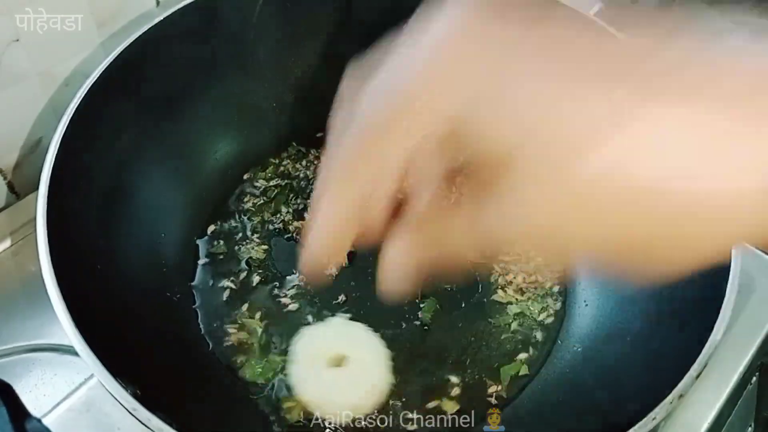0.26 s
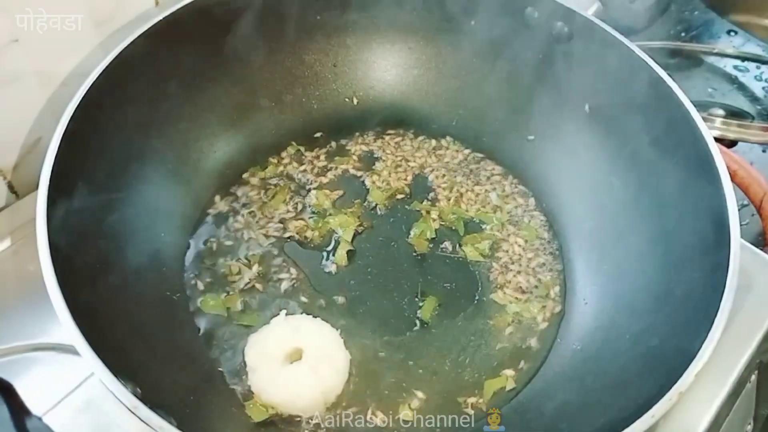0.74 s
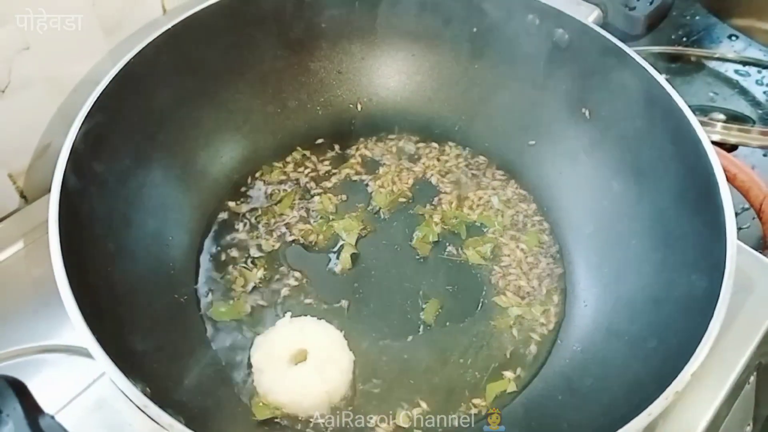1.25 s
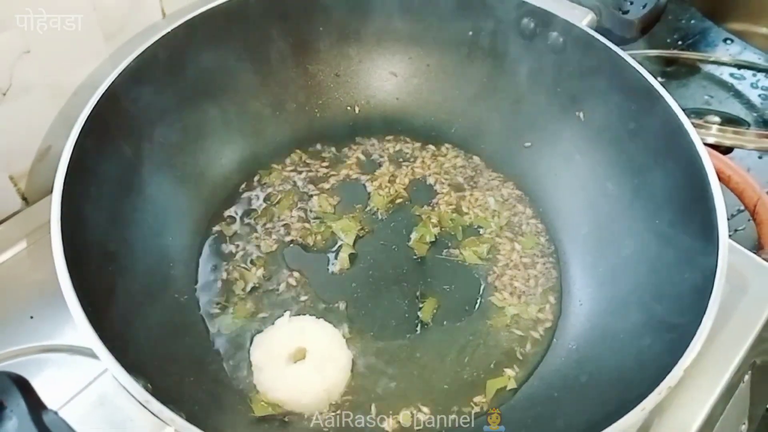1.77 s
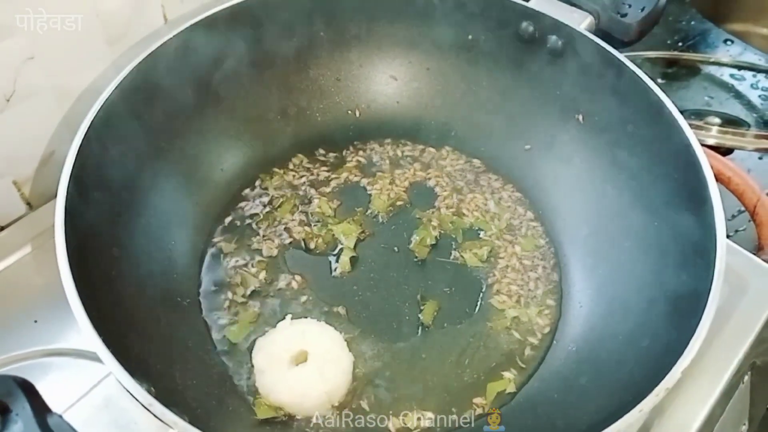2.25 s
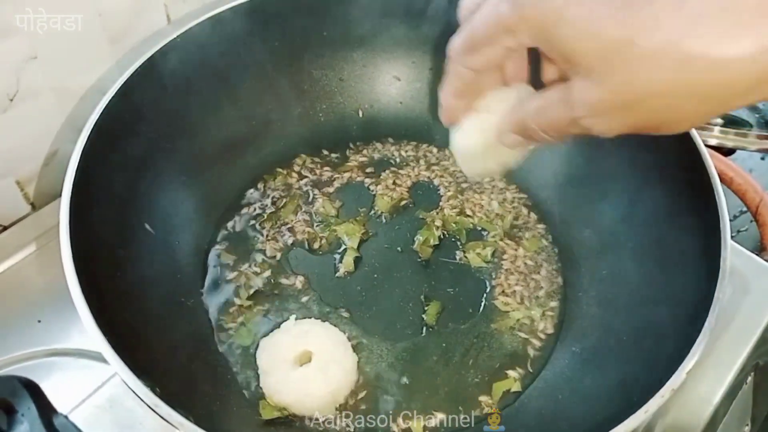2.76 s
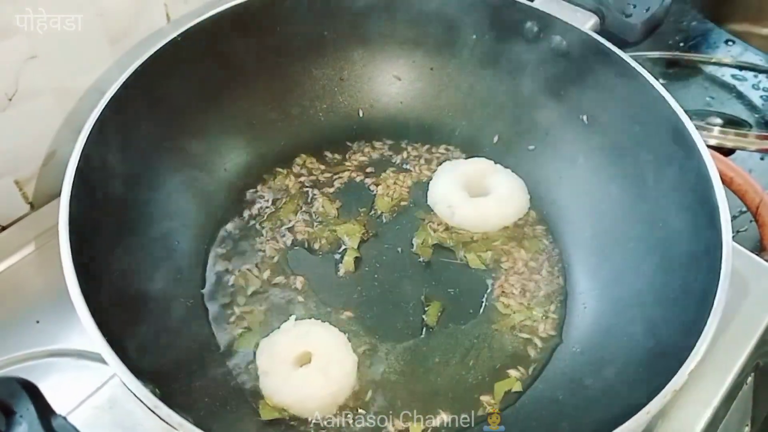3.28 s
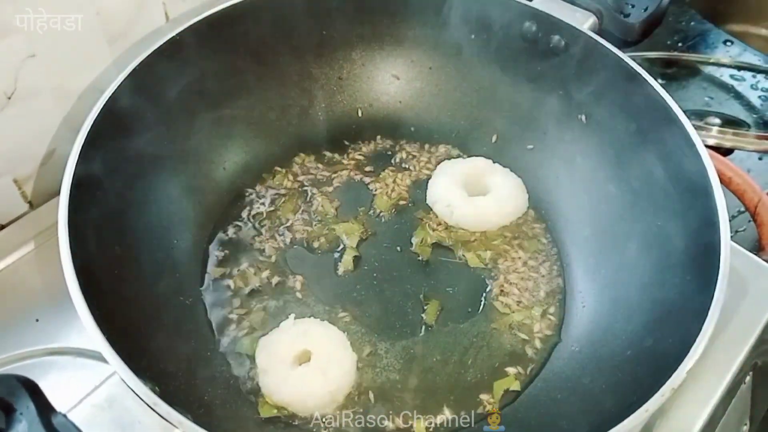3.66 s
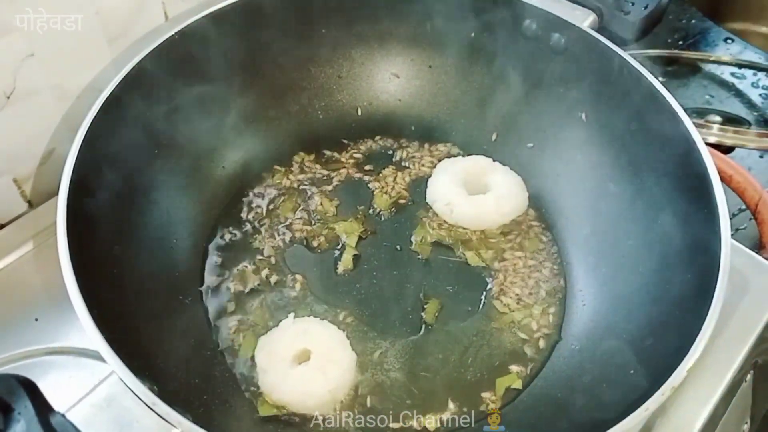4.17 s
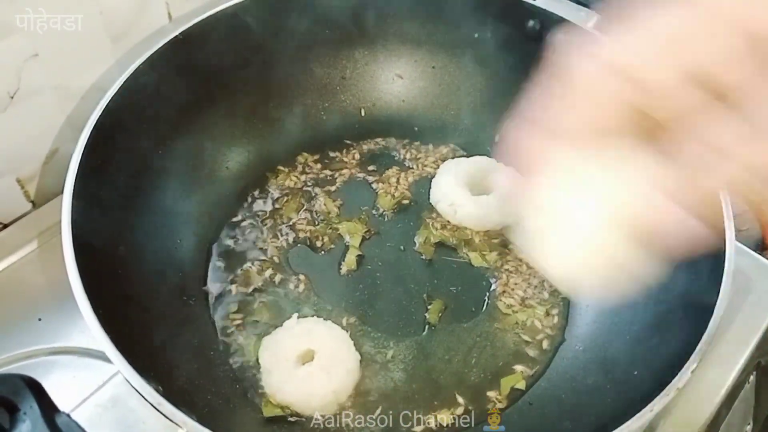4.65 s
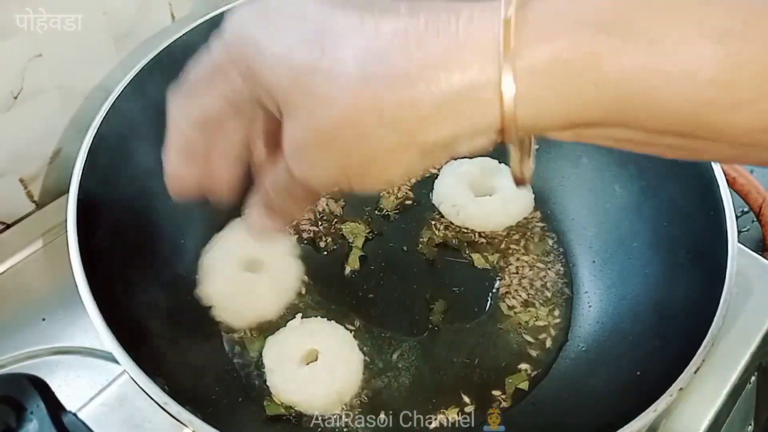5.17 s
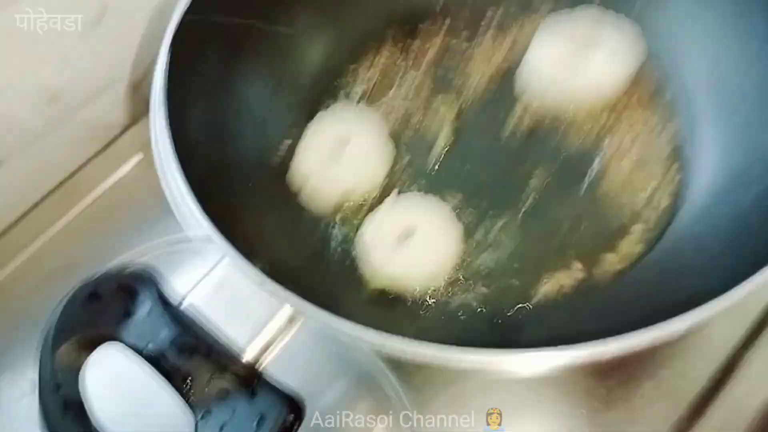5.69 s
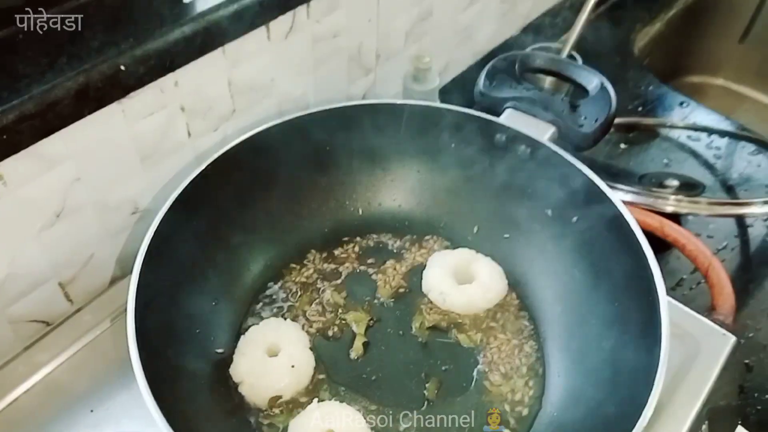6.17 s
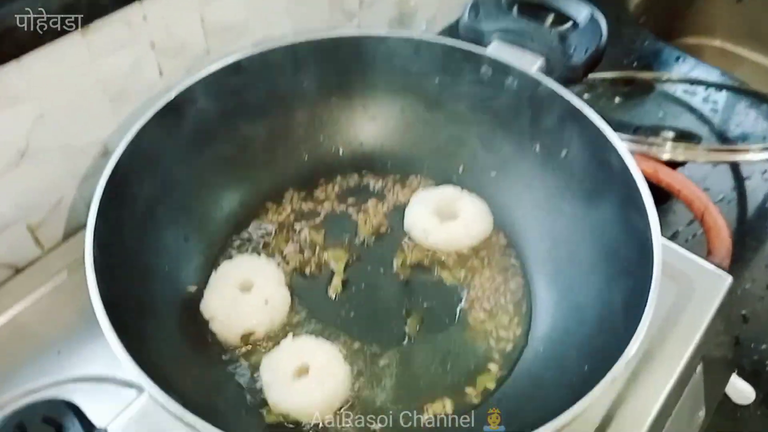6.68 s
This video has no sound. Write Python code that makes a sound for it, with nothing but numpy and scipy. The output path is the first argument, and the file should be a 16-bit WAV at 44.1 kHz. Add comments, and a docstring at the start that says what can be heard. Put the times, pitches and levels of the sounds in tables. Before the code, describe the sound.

A close, single-channel microphone hears hot oil in a pan in a small, hard-surfaced kitchen. At 0 s there is a soft low knock, a thin hissing simmer, a quiet low murmur and hum, and a faint rattle fluttering about twelve times a second. Two bright pops snap near 0.2 s, then it is sparse; the simmer lifts slightly at 0.8 s. From 1 s seeds crack one by one, crowding together from 2.3 to 3.5 s, with more muffled knocks. At about 3.55 s moisture hits the oil: a dense, bright sizzle erupts almost instantly, with sputtering and lower bubbling, strongest until about 3.8 s. It eases to a lower level near 4.9 s, swells around 5.6 s, dips near 5.9 s, then surges again from 6.2 s. Sharp spits, many lesser crackles and small microphone thumps continue to the end, near 6.9 s, without fading.

```python
"""Seeds and moist cakes in hot oil

Hot oil in a steel pan, heard from close by: seeds pop one by one over a thin simmer, then moist cakes burst
into a dense sizzle. Sizzle is hiss mixed with many tiny ringing bubbles; pops are short tones in a noisy crack.
Strong bursts push the microphone with a low thud. Filtered noise makes a murmur, a hum and a rattle about
twelve times a second; fading low tones make soft knocks, and two faint, slightly unsteady tones come and go."""
import sys
import numpy as np
from scipy import signal
from scipy.fft import rfft, irfft, next_fast_len
from scipy.io import wavfile
from scipy.ndimage import uniform_filter1d, map_coordinates

SR = 44100
rng = np.random.default_rng(int(sys.argv[2]) if len(sys.argv) > 2 else 0)


def log_audio(samples):
    """Write samples as a 16-bit WAV file to the path given in sys.argv[1]."""
    # one column per channel
    frames = np.atleast_2d(samples).T
    # limit to full scale, then quantise
    limited = np.clip(frames, -1, 1)
    pcm = np.round(limited * 32767).astype(np.int16)
    wavfile.write(sys.argv[1], SR, pcm)


N = 305613  # length in samples


def amp(db):
    """Turn decibels into a plain multiplier."""
    return 10 ** (np.asarray(db) / 20)


def unit(x):
    """Scale x to an average (rms) level of 1."""
    return x / np.sqrt(np.mean(x ** 2) + 1e-20)


def along(points, hz):
    """Read (Hz, value) points at any frequency, spaced the way we hear pitch."""
    f, v = np.transpose(points)
    return np.interp(np.log(hz + 1), np.log(f + 1), v)


def curves(rows):
    """Give one value per sample for each column after the time."""
    s, *cols = np.transpose(rows)
    return [np.interp(np.arange(N) / SR, s, c) for c in cols]


def wobble(rate):
    """A smooth random curve with `rate` random points a second."""
    knots = rng.standard_normal(int(N * rate / SR) + 4)
    return map_coordinates(knots, [np.arange(N) * rate / SR])


def filtered(x, response):
    """Multiply each frequency in x by a response, which may also shift its phase."""
    m = next_fast_len(N + SR // 2)
    spectrum = rfft(x, m) * response(np.fft.rfftfreq(m, 1 / SR))
    return irfft(spectrum, m)[..., :N]


def coloured(x, spectrum):
    """Shape x with (Hz, dB) points, then bring it to rms 1."""
    return unit(filtered(x, lambda hz: amp(along(spectrum, hz))))


def resonances(modes):
    """The response of things that ring at (Hz, width Hz, dB); every other one is turned upside down."""
    def response(f):
        total = 0
        for k, (centre, width, db) in enumerate(modes):
            damping = 1j * f * width
            total = total + (-1) ** k * amp(db) * damping / (centre * centre - f * f + damping)
        return total
    return response


def placed(s, shapes):
    """Add each row of shapes into the sound at its time in seconds."""
    at = np.round(s * SR).astype(int)[:, None] + np.arange(shapes.shape[1])
    return np.bincount(at.ravel(), shapes.ravel(), N + SR)[:N]


FLARE_S, RISE_S, FLARE_DIES_S = 3.555, .045, .12  # start, rise time, decay time of the flare (s)


def flare(late_s):
    """Moisture meets the oil: how far the sizzle has set in (0-1), and what is left of its flare (1-0)."""
    t = np.arange(N) / SR - FLARE_S - late_s
    risen = np.clip(t / RISE_S, 0, 1)
    left = np.exp(-np.clip(t - RISE_S, 0, None) / FLARE_DIES_S)
    return risen, left


# Level of the quiet background: it fades, jumps up once, then wavers.
# Each row: time in seconds, base level in dB.
QUIET_LEVEL = [(0, -38.5), (.3, -42), (.76, -45.5), (.8, -36), (.94, -38), (1.05, -43), (1.6, -44),
               (1.9, -40), (2.4, -43), (2.9, -42), (3.2, -43), (3.5, -40.5)]
# Level of the dense sizzle.
# Each row: time in seconds, base level of fizz and spray in dB, of splutter and seethe in dB.
BOIL = [(3.7, -22, -33.5), (3.75, -19, -33.5), (3.8, -18, -31.5), (4.06, -23, -35.5), (4.54, -25.5, -37.5),
        (4.69, -25.5, -40), (4.93, -28, -39.5), (5.16, -25, -37), (5.45, -24, -34), (5.67, -22.5, -35),
        (5.84, -27.5, -37), (6.07, -27.5, -37), (6.26, -23.5, -34), (6.51, -25, -36), (6.72, -24, -36),
        (6.93, -22.5, -30.5)]
# Balance of the layers. Each entry: dB added to the quiet level, dB added to the sizzle, extra dB at the flare.
LAYERS = {"fizz": (0, -2, -1.8), "splutter": (-3.1, 1.97, 9.8), "seethe": (-6.5, -2.83, 5),
          "spray": (-8.5, -15, 0)}
# Each layer joins the sizzle a little late. Each entry: delay in seconds.
LATE_S = {"fizz": .005, "splutter": .015, "seethe": .095, "spray": .02}


def strength_of(layer):
    """Gain of a bubble layer: the quiet level, plus the sizzle once it reaches this layer."""
    calm_db, busy_db, flare_db = LAYERS[layer]
    risen, left = flare(LATE_S[layer])
    fizz_spray_db, splutter_seethe_db = curves(BOIL)
    boil_db = splutter_seethe_db if layer in ("splutter", "seethe") else fizz_spray_db
    quiet = amp(curves(QUIET_LEVEL)[0] + calm_db)
    boil = risen * amp(boil_db + busy_db + flare_db * left)
    return np.hypot(quiet, boil)


# Small bursts per second, before each layer takes its share: always, added by the sizzle, added by the flare
CALM_RATE, SIZZLE_ADDS_RATE, FLARE_ADDS_RATE = 18, 450, 350
CALM_STRENGTH, BUSY_STRENGTH = 0.19, 0.82  # weight of bursts in the mix with the hiss


def spatter(pitch_hz, octaves, cycles, share, spread_db, hiss):
    """Hiss plus tiny bubbles that burst at random pitches, a few much larger than most."""
    risen, left = flare(0)
    rate = CALM_RATE + risen * (SIZZLE_ADDS_RATE + FLARE_ADDS_RATE * left)
    strength = CALM_STRENGTH + risen * (BUSY_STRENGTH - CALM_STRENGTH)
    s = np.flatnonzero(rng.random(N) < share * rate / SR) / SR
    t = np.arange(300) / SR
    luck = rng.standard_normal((len(s), 2))
    hz = np.clip(pitch_hz * 2 ** (octaves * luck[:, :1]), 300, 15000)
    life = cycles / hz * np.exp(0.2 * luck[:, 1:])  # seconds
    size = amp(spread_db * np.minimum(rng.exponential(size=(len(s), 1)), 3))
    ring = t / life * np.exp(-t / life) * np.sin(2 * np.pi * hz * t)
    bubbles = placed(s, size * ring)
    # Level the bubbles over half a second, so that strength alone sets their weight
    power = np.abs(uniform_filter1d(bubbles ** 2, SR // 2)) + 1e-9
    mix = strength * bubbles / np.sqrt(power) + hiss * rng.standard_normal(N)
    return mix / np.hypot(strength, hiss)


# Tone colour of fizz, splutter and broad cracks. Each row: frequency in Hz, relative level in dB.
FIZZ = [(1470, -35), (2500, -18.5), (3290, -13), (3860, -7), (4820, -9), (5080, -7), (7880, -2),
        (8990, 2.5), (9410, 2), (12000, -16.5), (15600, -27), (22000, -120)]


def fizz_and_splutter(surge):
    """Bubbles break at the oil's surface: fizz above about 6 kHz, splutter from about 3 to 6 kHz."""
    bubbles = spatter(8030, octaves=0.57, cycles=0.77, share=1.1, spread_db=2.5, hiss=.85)
    fine = coloured(bubbles, FIZZ)
    lower = filtered(fine, lambda f: 1 / (1 + (f / 6000) ** 6) / (1 + (2900 / (f + 1)) ** 10))
    upper = filtered(fine, lambda f: 1 / (1 + (6000 / (f + 1)) ** 6))
    fizz = strength_of("fizz") * unit(upper)
    splutter = strength_of("splutter") * unit(lower)
    return amp(1.23 * surge) * (fizz + splutter)


# Tone colour of the finest bubbles. Each row: frequency in Hz, relative level in dB.
SPRAY = [(6470, -74), (11000, 4.5), (11800, -2), (13800, 11.5), (15600, -0.5)]


def spray(surge):
    """The finest bubbles sound highest, as a flickering hiss."""
    finest = spatter(11500, octaves=0.24, cycles=1.9, share=0.44, spread_db=7, hiss=2.3)
    flicker = amp(1.6 * surge + 0.77 * wobble(27))
    return strength_of("spray") * flicker * coloured(finest, SPRAY)


# Large bubbles, coloured by the pan's low resonances. Each row: frequency in Hz, relative level in dB.
SEETHE = [(400, -11.5), (900, -2.5), (1200, -11.5), (1330, 5.5), (1420, -7.5), (1530, 1), (1750, -0.5),
          (2050, 1), (2500, 1), (3500, 2), (4600, -4), (7700, -120)]
# Narrow ringing notes of the pan. Each row: frequency in Hz, width in Hz, relative level in dB.
PAN_RINGS = [(857, 21, -5.5), (1321, 37, 4), (1533, 24, 0), (1568, 24, 3), (2043, 14, -2), (3110, 14, -11),
             (3554, 18, 7), (4278, 17, -4)]
PAN_RING_DB = -8  # mean level of the ringing against the seethe


def seethe(surge):
    """Large bubbles sound lower, and keep the pan ringing at its own notes."""
    large = spatter(2305, octaves=0.529, cycles=1.53, share=.6, spread_db=3.5, hiss=2.19)
    bubbling = amp(0.64 * surge + 2.2 * wobble(12)) * coloured(large, SEETHE)
    pan = unit(filtered(large, resonances(PAN_RINGS)))
    ringing = amp(PAN_RING_DB + 3.2 * wobble(5.5)) * pan
    return strength_of("seethe") * (bubbling + ringing)


def sizzle():
    """Steam bubbles break at the oil's surface, the smaller the higher; the bubbling layers share a surge."""
    surge = wobble(16) + 0.73 * wobble(6.6)
    return fizz_and_splutter(surge) + spray(surge) + seethe(surge)


# Tone colour of the low murmur. Each row: frequency in Hz, relative level in dB.
KITCHEN = [(18, -48), (30, -2), (103, 1.5), (156, -16), (207, 5), (252, -4), (433, -2.5), (755, -4),
           (1010, -15.5), (1200, -11), (1560, -47), (2640, -120)]
# Bands of the hum. Each row: frequency in Hz, width in Hz, relative level in dB.
HUM = [(115, 40, -1.5), (201, 28, -15)]
# Their loudness. Each row: time in seconds, base level of the murmur in dB, of the hum in dB.
MURMUR = [(0.0, -51.5, -51), (0.29, -53.5, -58), (1.1, -54.5, -52), (1.77, -55.5, -70), (2.05, -53.5, -53),
          (3.38, -58.5, -63), (4.21, -55, -63), (4.65, -58, -68), (5.65, -54, -60), (6.16, -54, -64),
          (6.56, -52.5, -57), (6.93, -52, -72)]


def murmur():
    """Low noise and a hum made of noise in narrow bands, wavering together."""
    murmur_db, hum_db = curves(MURMUR)
    low = amp(murmur_db) * coloured(rng.standard_normal(N), KITCHEN)
    hum = amp(hum_db) * unit(filtered(rng.standard_normal(N), resonances(HUM)))
    return amp(2.1 * wobble(24)) * (low + hum)


# Ringing notes of the rattling thing. Each row: frequency in Hz, width in Hz, relative level in dB.
RATTLE = [(1270, 220, 0.5), (2410, 120, 0.5), (3640, 28, -1), (3905, 87, 8.5), (4220, 45, 7),
          (5520, 58, 10)]
RATTLE_DB, RATTLE_FOLLOWS = -47, 1.58  # level in dB at the mean quiet level, dB change per dB of quiet level


def rattle():
    """Noise kicked about twelve times a second, a little unevenly, makes something ring."""
    quiet_db = curves(QUIET_LEVEL)[0]
    swell_db = quiet_db - quiet_db.mean()
    turns = np.cumsum(12 * (1 + 0.037 * wobble(3))) / SR
    shake = (0.28 + np.exp(-(turns % 1) * 5)) * rng.standard_normal(N)
    ringing = unit(filtered(shake, resonances(RATTLE)))
    return amp(RATTLE_DB + RATTLE_FOLLOWS * swell_db) * ringing


# Soft knocks. Each row: start in seconds, strength in dB.
KNOCKS = [(0.06, -21), (0.354, -35), (0.499, -78), (0.76, -36.5), (0.925, -32), (1.244, -32), (1.604, -33),
          (1.776, -39), (1.913, -33), (2.19, -39), (2.857, -34), (3.002, -36), (3.276, -35), (3.47, -38)]


def knocks():
    """Two low tones start softly together and fade by 60 dB in 52 ms."""
    s, db = np.transpose(KNOCKS)[..., None]
    t = np.arange(3000) / SR
    tones = np.sin(2 * np.pi * 205 * t) + 0.56 * np.sin(2 * np.pi * 120 * t)
    knock = tones * (1 - np.exp(-t / 0.0022)) * amp(-60 * t / 0.052)
    return placed(s[:, 0], amp(db) * knock)


# Faint tones that come and go. Each row: start in seconds, end in seconds, mean pitch in Hz, mean strength in dB.
DRONES = [(-1, 1.1, 766, -60), (3.15, 3.5, 207, -58)]


def drones():
    """Tones with soft ends, slightly unsteady in loudness and pitch."""
    t = np.arange(N) / SR
    total = np.zeros(N)
    for start, end, hz, db in DRONES:
        fade = np.clip(np.minimum(t - start, end - t) / 0.067, 0, 1)
        tone = np.sin(2 * np.pi * hz * t + .6 * wobble(18))
        total += amp(db + 2.5 * wobble(8)) * fade * tone
    return total


LESSER_CALM, LESSER_BUSY = 1.5, 22  # lesser pops per second in the simmer and in the sizzle
# Mean strength in dB over the fizz, middle pitch in Hz, mean snap in dB
LESSER_OVER_DB, LESSER_HZ, LESSER_SNAP_DB = 20, 8430, -16


def lesser_pops():
    """Rows like those of the loud bursts, at random moments, with strength following the fizz."""
    rate = LESSER_CALM + flare(0)[0] * (LESSER_BUSY - LESSER_CALM)
    at = np.flatnonzero(rng.random(N) < rate / SR)
    luck = rng.standard_normal((len(at), 3))
    db = 20 * np.log10(strength_of("fizz")[at]) + LESSER_OVER_DB + 1.15 * luck[:, 0]
    hz = np.clip(LESSER_HZ * 2 ** (0.21 * luck[:, 1]), 3000, 11000)
    snap_db = LESSER_SNAP_DB + 6 * luck[:, 2]
    return np.transpose([at / SR, db, hz, snap_db])


# How long the room rings. Each row: frequency in Hz, time to fade by 60 dB in seconds.
ROOM = [(300, 0.21), (3000, 0.2), (9000, 0.21), (15000, 0.27)]


def room(x):
    """Hard walls answer with a fading noise tail, drawn anew for every eighth of a second."""
    out, step = np.zeros(N + 2 * SR), SR // 8
    for at in range(0, N, step):
        hz, t, z = signal.stft(rng.standard_normal(SR // 3), SR, nperseg=256)
        faded = z * amp(-60 * t / along(ROOM, hz)[:, None])
        tail = signal.istft(faded, SR, nperseg=256)[1]
        wet = signal.fftconvolve(x[at:at + step], tail / np.linalg.norm(tail))
        out[at + 150:][:len(wet)] += wet  # 150 samples: the answer starts 3.4 ms late
    return out[:N]


# Echoes inside the pan. Each row: delay in milliseconds, level in dB against the direct sound.
PAN_WALL = [(1.504, -8.5), (2.6, -20), (4.2, -14)]


def pan_echoes(x):
    """The pan's wall throws back a few quick copies of the sound."""
    def response(f):
        return 1 + sum(amp(db) * np.exp(-2j * np.pi * f * ms / 1000) for ms, db in PAN_WALL)
    return filtered(x, response)


# Loud bursts of seeds and wet dough.
# Each row: start in seconds, relative strength in dB, pitch in Hz, relative snap (bright crack) in dB.
POPS = [(.045, -14, 8000, -8), (.1791, 2.5, 8300, -35), (.2244, -4.5, 6700, -37), (.4007, -24, 7600, 0),
        (.4853, -23, 8200, 5), (.832, -15, 8500, -6), (.965, -7, 6800, 3.5), (.9694, -1, 6860, -8),
        (1.145, -2.5, 6600, 5.5), (1.2266, -10, 8700, -10), (1.345, -3.5, 8930, -5),
        (1.4209, -7, 9900, 2.5), (1.5115, -1, 8630, -33), (1.6755, 6.5, 6900, -10),
        (1.7876, 3, 8070, -13.5), (1.832, 3, 7900, -17), (1.9533, -9, 7100, -13), (2.0056, -7, 6940, 3.5),
        (2.0445, -1.5, 8900, -8), (2.1262, -6.5, 4000, -22), (2.173, 4.5, 7060, -42),
        (2.278, -14, 5900, -9), (2.293, -6, 9150, -25), (2.3352, -9, 7650, -7), (2.3572, -10.5, 6300, 10),
        (2.3712, -10, 8300, -10), (2.4259, -1.5, 9800, -3), (2.5094, 4, 9200, -18),
        (2.5448, -2.5, 6660, -1), (2.5962, 0, 9000, 1), (2.7062, 7.5, 5500, -35), (2.7106, 6, 7600, -25),
        (2.739, -2, 7500, 1), (2.7536, 7, 8300, -1), (2.785, 3.5, 9630, -13), (2.8314, -4.5, 9500, -12),
        (2.844, -7, 5200, -3), (2.9369, -13, 8800, 0), (3.0124, -7, 6300, -16), (3.0881, 1.5, 8550, -12.5),
        (3.1323, -2.5, 8330, 3.5), (3.1806, -13.5, 9100, -2), (3.2317, -13, 5000, -17),
        (3.2815, .5, 6300, -20), (3.312, -10, 7400, -12), (3.3365, 1, 9300, -3), (3.3751, -7, 6540, -14),
        (3.394, 4, 7200, -20), (3.4195, -1, 7900, -3.5), (3.495, 0.5, 6380, -7), (3.512, -4.5, 5770, -11),
        (3.527, -0.5, 7400, -12), (3.5618, 5, 8600, -23), (3.5736, 3, 8500, -27), (3.5877, -9, 9100, -26),
        (3.5956, -6.5, 5400, -26), (3.618, -1, 6000, -31), (3.7447, 0, 8550, -12), (3.8948, 1, 8850, -13),
        (3.9657, -1, 8800, -17), (4.161, 8, 9100, -8), (4.274, .5, 4740, -7), (4.405, 3.5, 9000, -8),
        (4.4955, -2, 7640, -22), (4.6103, -12, 8660, 2), (4.6547, 0, 8550, -4), (4.7266, 0, 8950, -15),
        (4.814, 2.5, 7160, -29), (4.8889, -27, 8980, -6), (4.9195, -13, 8850, 3), (4.975, 6, 8900, -33),
        (5.1253, 8, 8940, -21), (5.1728, 1, 7600, -33), (5.2683, -20, 8500, -22), (5.3478, -0.5, 5970, -24),
        (5.417, -4, 8200, -22), (5.4946, -2, 9000, -4), (5.532, 4, 7300, -28), (5.5361, 5, 9130, -20),
        (5.6513, -3.5, 6540, -15), (5.7419, 0, 9200, -14), (5.8548, 5, 6960, -22), (6.0065, -4, 9000, -27),
        (6.0313, 2, 8400, -10), (6.0842, -.5, 9400, -9), (6.1659, 1, 8500, -27), (6.2214, -3.5, 8900, -5),
        (6.249, -19, 9200, -23), (6.261, 4.5, 9000, -32), (6.3752, 1.5, 9500, -20), (6.4237, 6, 9400, -16),
        (6.4614, 2.5, 7570, -13), (6.506, 4.5, 9200, -9), (6.7122, 4, 8900, -7), (6.729, 3, 9700, -8),
        (6.7907, -.5, 8360, -12), (6.8111, 2, 6300, -20), (6.828, 4.5, 8740, -11), (6.924, 0, 8260, -2)]


def pops():
    """A cavity snaps open: a few cycles at its pitch and a neighbour, in a broad crack that fills the room."""
    rows = np.vstack([POPS, lesser_pops()])
    s, db, hz, snap_db = rows.T[..., None]
    s = s[:, 0]
    t = np.arange(160) / SR
    luck = rng.random((len(rows), 2))
    fade = t / 0.00024 * np.exp(-t / 0.00019)
    neighbour_hz = hz * (0.587 + 0.31 * luck[:, :1])
    neighbour = np.sin(2 * np.pi * (neighbour_hz * t + luck[:, 1:]))
    ring = np.sin(2 * np.pi * hz * t) + 0.77 * neighbour
    crack = fade * rng.standard_normal((len(rows), len(t)))
    crack = crack / np.linalg.norm(crack, axis=1, keepdims=True)
    broad = filtered(placed(s, amp(db + 8.0) * crack), lambda f: amp(along(FIZZ, f)))
    # The snap keeps only the top treble; the tone loses its bass
    snap = filtered(placed(s, amp(db + snap_db + 17) * crack), lambda f: 1 / (1 + (11500 / (f + 1)) ** 8))
    tone = filtered(placed(s, amp(db + 3.5) * fade * ring), lambda f: 1 / (1 + (2600 / (f + 1)) ** 4))
    into_room = amp(-9.5) * tone + amp(-3) * broad + amp(-10.5) * snap
    return pan_echoes(tone + broad + snap) + room(into_room)


# Pushes on the microphone.
# Each row: start in seconds, relative strength in dB, length in ms (kept within 0.05-3; falls to a quarter by then).
THUDS = [(1.1472, -9.5, 0.6), (2.0437, -5.5, 3.5), (2.5449, 2, 0.15), (2.74, -24, .37), (2.7535, -10, 0.63),
         (3.1325, -24, 0.52), (3.336, -15.5, 0.089), (3.719, -7, 0.089), (3.7366, -7, 0.38),
         (3.805, -8.5, 0.21), (3.833, -9.5, 0.34), (3.9265, -16, 0.71), (3.9691, -14.5, 0.55),
         (4.127, -18.5, 0.33), (4.1597, -5.5, 1.8), (4.199, -19, 0.74), (4.274, -1, 1.7),
         (4.3086, -16.5, .54), (4.362, -3.5, 0.11), (4.611, -2.5, 0.17), (4.6427, -9, 0.087),
         (4.6567, -8, 0.1), (4.7268, -14.5, 0.4), (4.8893, -15.5, 0.34), (4.92, -16.5, 0.3),
         (5.0244, -17.5, 1.3), (5.269, -20, 2.4), (5.495, -10.5, .18), (5.6112, -21, 1.04),
         (5.6257, -6, 0.16), (5.6518, -4, 1.7), (5.742, -4.5, 0.25), (5.855, -11, 0.25),
         (6.0837, -11, 0.17), (6.501, -5.5, 0.32), (6.5052, -7.5, 0.51), (6.7228, -17, 0.42),
         (6.7404, -10, 0.19), (6.7902, -3.5, 0.17)]


def thuds():
    """A blast shoves the membrane one way or the other with a sharp front, then lets go."""
    s, db, ms = np.transpose(THUDS)[..., None]
    t = np.arange(400) / SR
    way = rng.choice([-1, 1], size=(len(THUDS), 1))
    push = np.exp(-t * 1400 / np.clip(ms, .05, 3))
    front = 3.1 * np.exp(-t / 0.000041)
    onset = 1 - np.exp(-t / .00004)
    return placed(s[:, 0], way * amp(db) * onset * (push + front))


def scene():
    """Everything heard at once, in one channel."""
    kitchen = murmur() + rattle() + knocks()
    return (sizzle() + kitchen + drones() + pops() + thuds())[None]


TOP_HZ = 15700  # nothing is kept from here up


def record(dry):
    """The microphone cuts the deep bass steeply, which makes thuds swing back; peaks are softly clipped."""
    def bass_cut(f):
        gentle = 1j * f / (1j * f + 60)
        steep = -f * f / (85 ** 2 - f * f + 1j * f * 85 / 1.05)
        return gentle * steep
    cut = filtered(dry, bass_cut)
    clipped = cut / (1 + np.abs(cut / 0.85) ** 8) ** (1 / 8)
    return filtered(clipped, lambda hz: hz < TOP_HZ)


dry = scene()
out = record(dry)
log_audio(out)
```